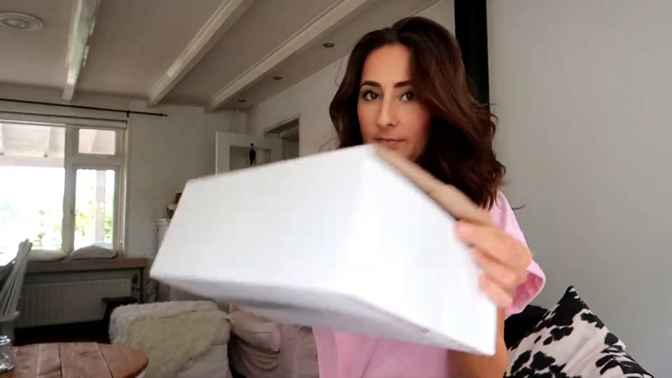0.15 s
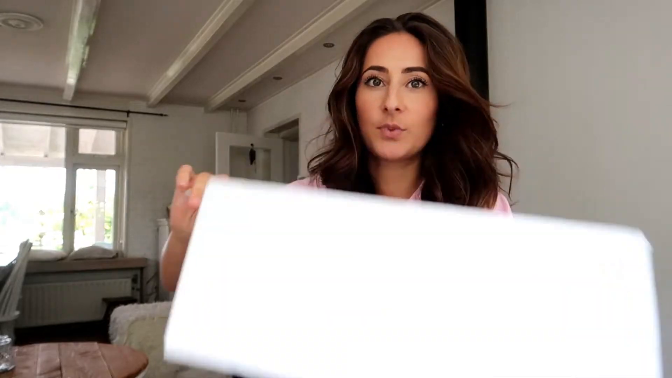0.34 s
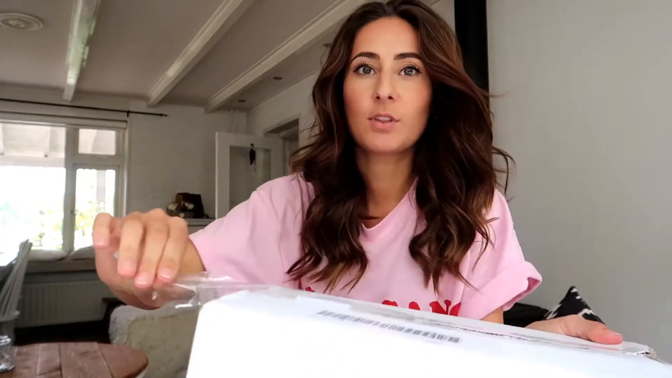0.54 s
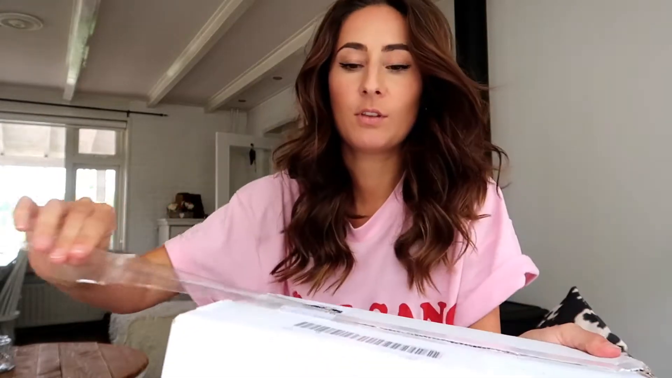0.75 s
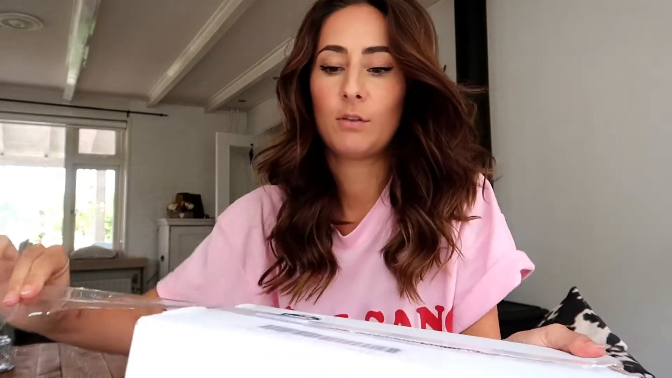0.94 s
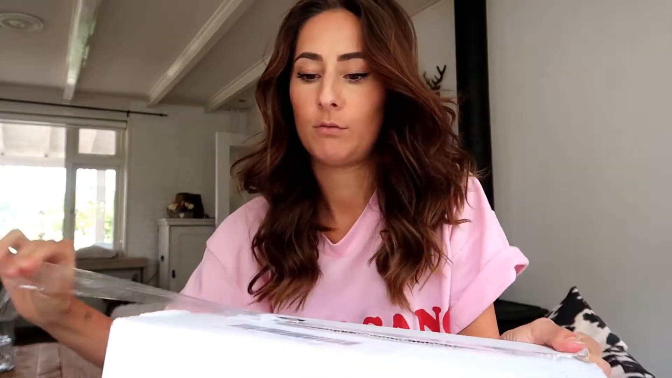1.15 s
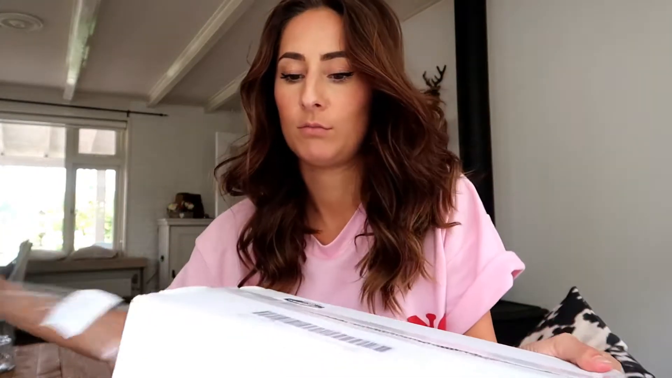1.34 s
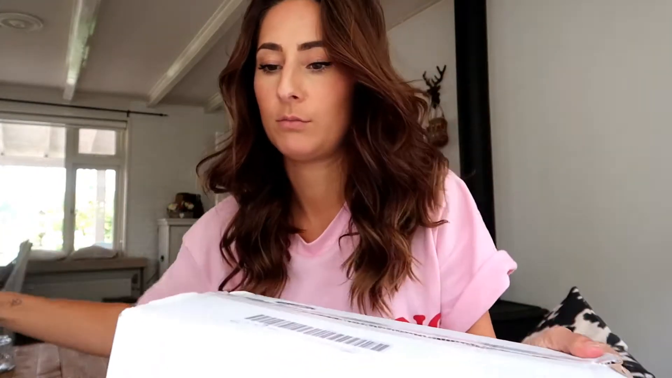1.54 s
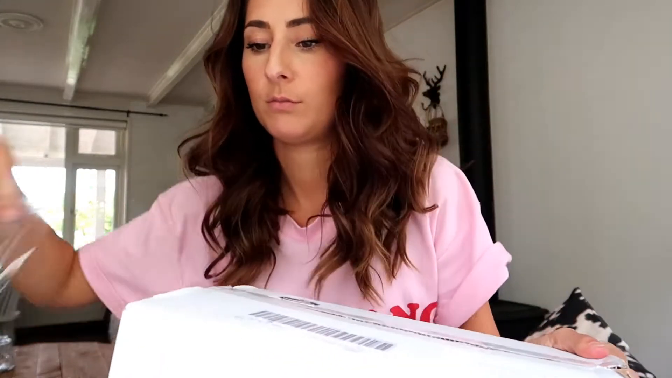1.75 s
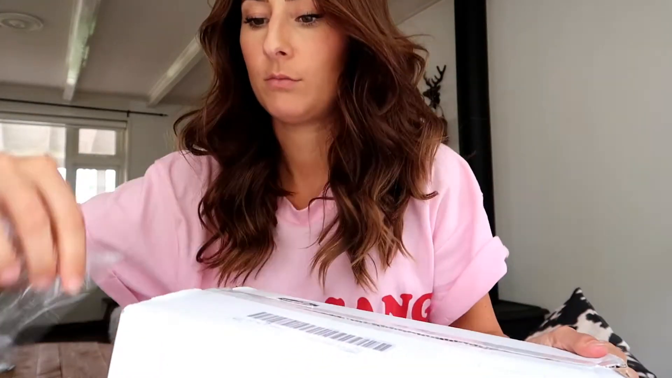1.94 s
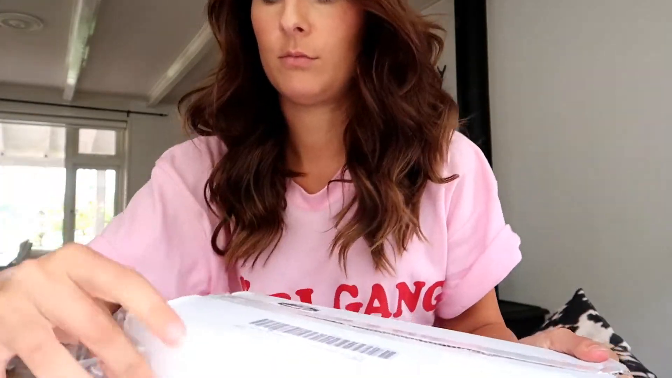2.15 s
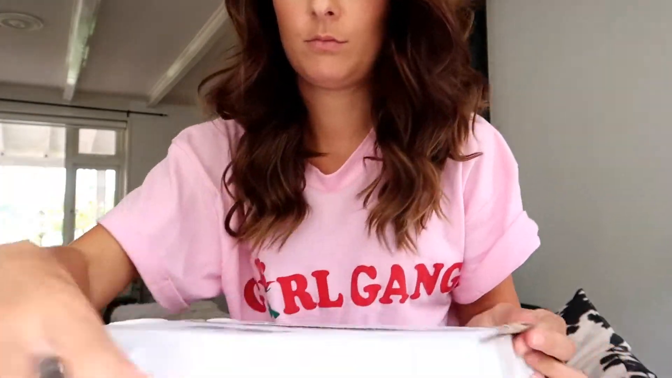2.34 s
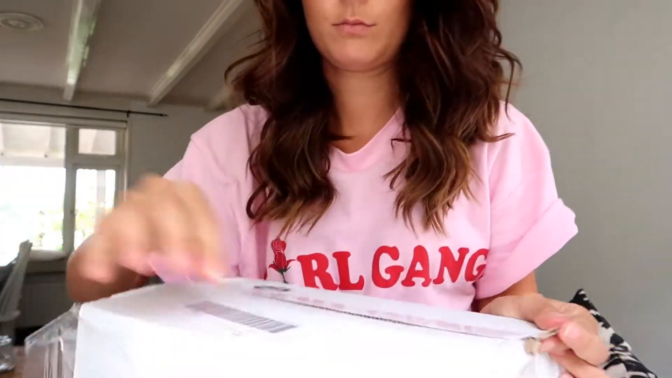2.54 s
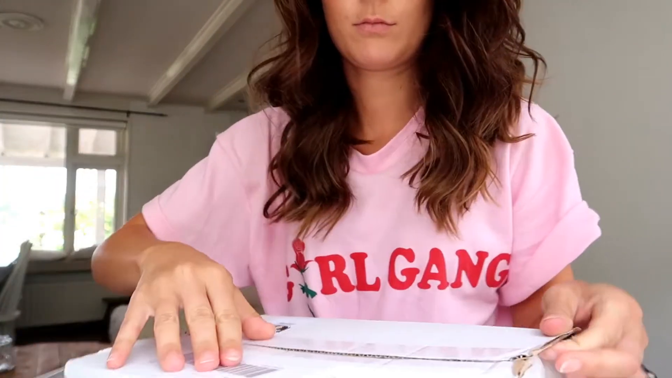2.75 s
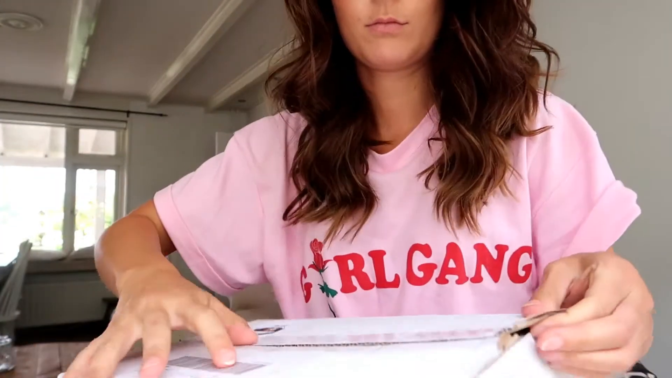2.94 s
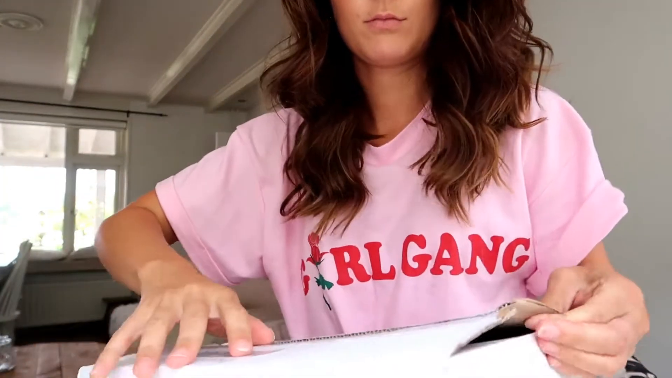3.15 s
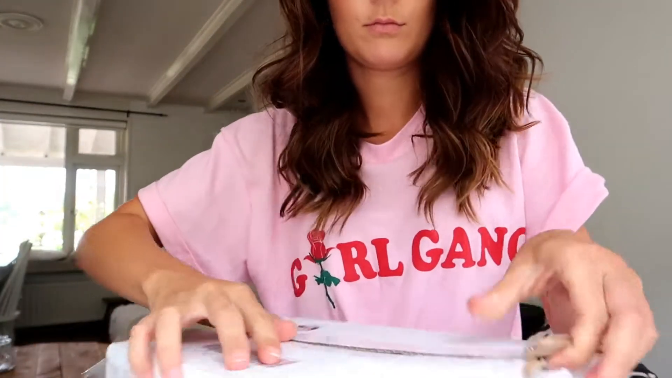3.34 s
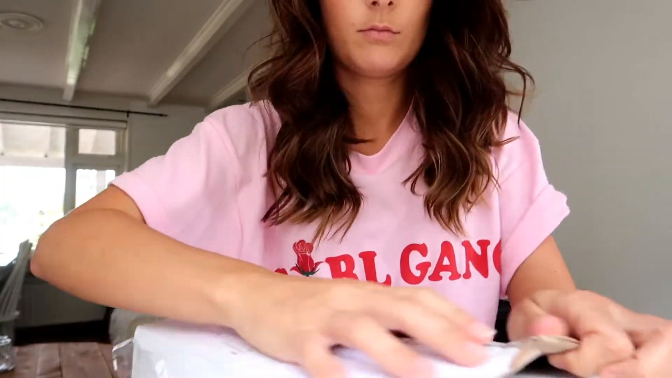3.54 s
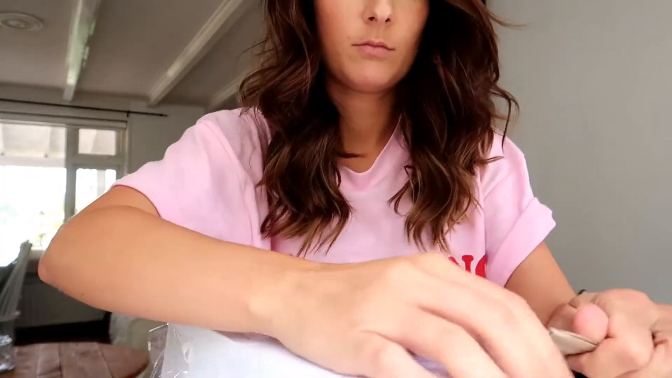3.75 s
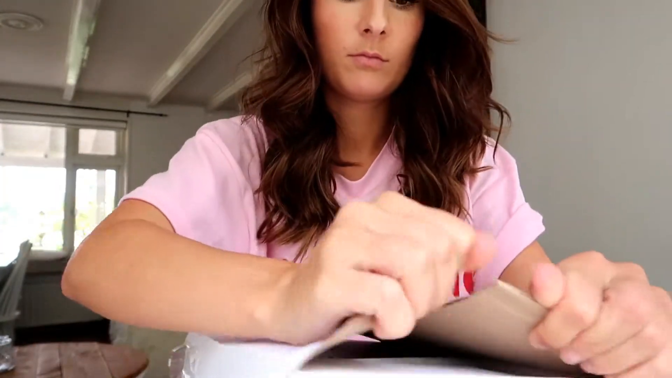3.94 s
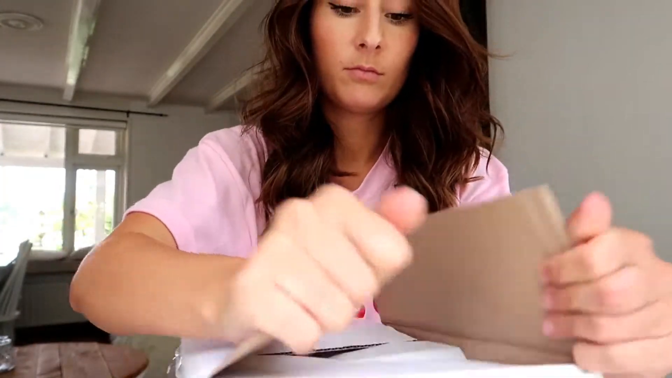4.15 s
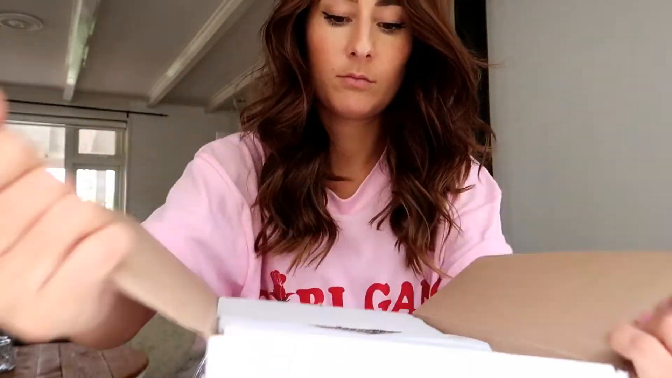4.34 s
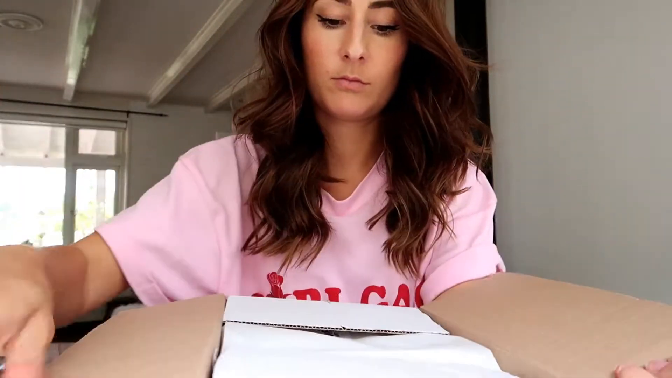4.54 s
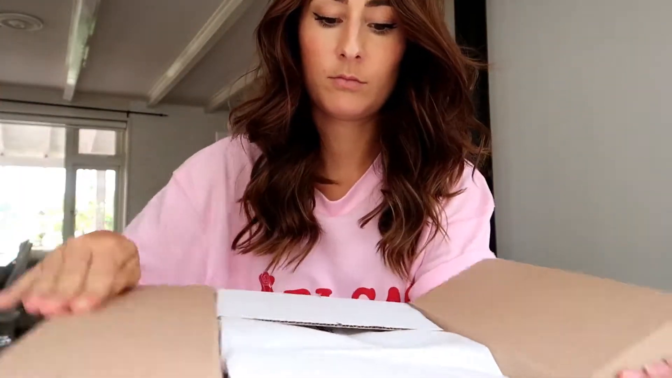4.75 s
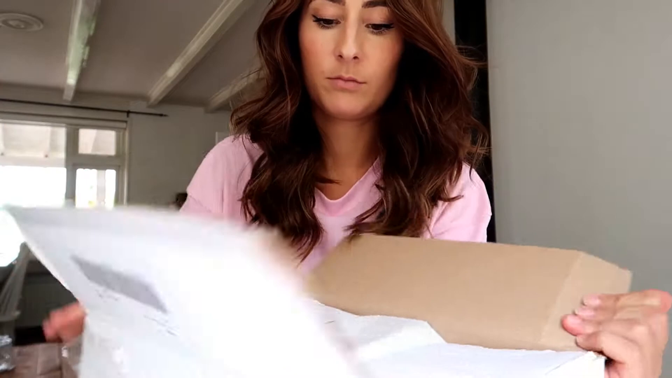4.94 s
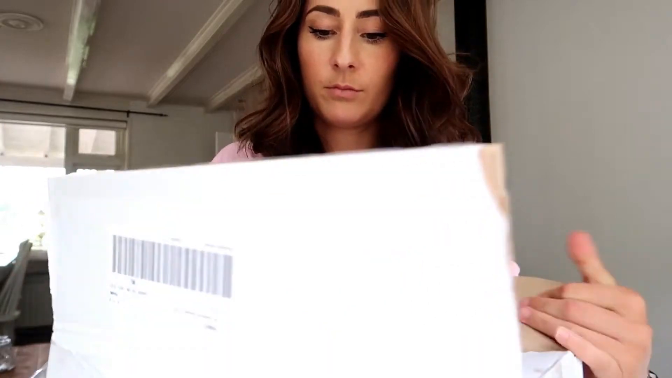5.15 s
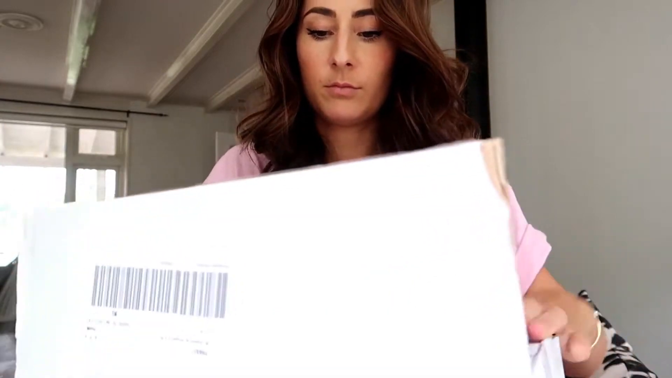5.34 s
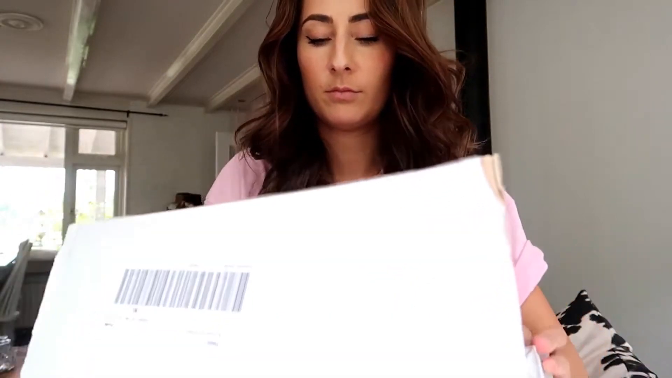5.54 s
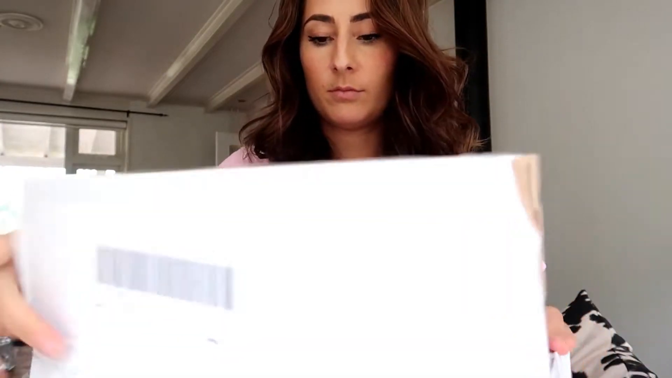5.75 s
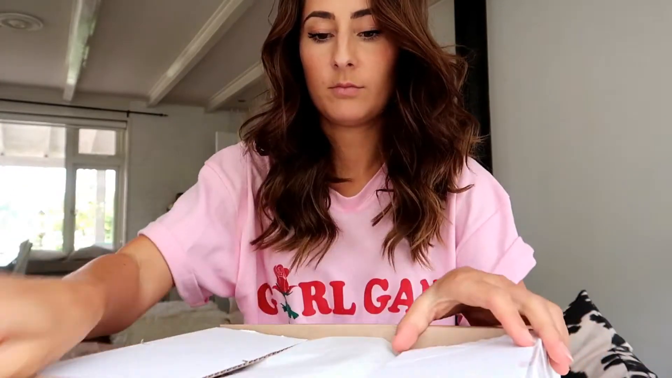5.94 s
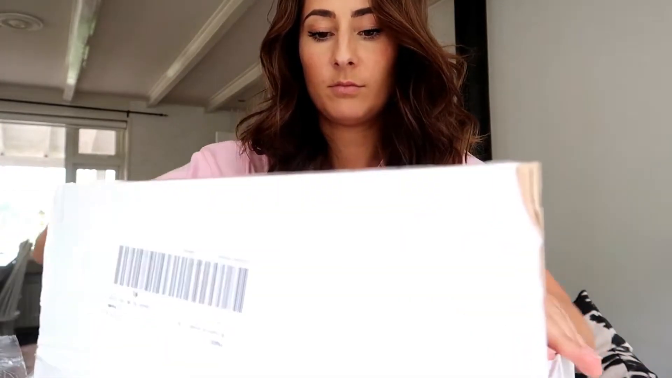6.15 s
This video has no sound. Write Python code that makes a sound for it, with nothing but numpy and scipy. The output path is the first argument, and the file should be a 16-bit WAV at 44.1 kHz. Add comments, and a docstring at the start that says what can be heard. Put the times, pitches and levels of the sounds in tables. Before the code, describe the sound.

Packing tape rips off a hollow cardboard parcel in sharp bursts, then hands knock, rustle and snap the flaps open in a furnished room.

```python
"""Packing tape tears off a cardboard parcel, close to a small stereo microphone in a furnished room.
Stick-slip friction supplies bursts of tiny slips, which parallel resonances of tape and card colour.
Hands rub, knock and push the box: its hollow body booms, its panels and the hollow under the flaps ring.
Sharp snaps are crumbling bursts of band-passed noise; reflections, a faint murmur and a low hum lie behind.
"""
import sys
import numpy as np
from scipy import signal
from scipy.fft import rfft, irfft, next_fast_len
from scipy.io import wavfile
from scipy.ndimage import uniform_filter1d

SR = 44100
rng = np.random.default_rng(int(sys.argv[2]) if len(sys.argv) > 2 else 0)


def persist_wave(psi):
    """Save psi, clipped to +-1, as 16-bit WAV."""
    counts = np.round(np.clip(psi, -1, 1) * 32767).astype(np.int16)
    wavfile.write(sys.argv[1], SR, np.atleast_2d(counts).T)


N = 273420   # length in samples

# Two pulls on the tape and the last tug that frees it.
# Each row: start in seconds, swell in seconds, hold in seconds, rustle level in dB.
TAPE_PULLS = [(0.696, 0.077, 0.064, -21.5), (1.188, 0.0027, 0.11, -23), (1.349, 0.012, 0.011, -29.5)]
PULL_SWELL_DB, PULL_RELEASE_DB_PER_S = 10, 248   # depth from which a pull swells; fall as the strip lets go
PULL_BOOM_DB, PULL_PANEL_DB, PULL_SIZZLE_DB = 1, 5, 1.5   # over the rustle, at the start of a pull
# The box is shaken less as the strip comes away.
PULL_BOOM_SAG_DB_PER_S, PULL_PANEL_SAG_DB_PER_S = 75.5, 59.5

# Hands on the box, written in three stretches of time, with a sudden change just after 2.06 s. # Each row: time
# in seconds, rustle level in dB, weight of the grip as boom over rustle in dB, # crispness as sizzle over
# rustle in dB.
HAND_MOVES = [
    [(0.0, -47, 6, -5), (0.22, -52, 1.5, -27), (0.34, -47, 3.5, -22), (0.83, -38, 4.5, -7),
     (1.02, -44.5, -6, -6), (1.23, -52.5, 16, -30), (1.36, -26, -33, -24), (1.61, -55.5, 1.5, -33),
     (1.78, -77, 23.5, -16.5), (2.06, -69.5, 9, -18)],
    [(2.08, -48, 11.5, -5), (2.12, -56, 16.5, 4), (2.25, -45.5, 10, -6), (2.3, -33, 3, 1),
     (2.44, -49, 2, -28), (2.55, -51, 12.5, -5.5), (3.34, -49, 7, -16), (3.47, -41.5, 2.5, -2.5),
     (4.09, -44.5, 0.5, -10.5), (4.14, -58.5, -2, -19)],
    [(4.16, -34.5, 7.5, -20), (4.27, -53.5, -4, -39), (4.48, -50.5, 11.5, -2.5), (4.77, -45.5, 0.5, -3),
     (4.94, -44.5, -10, -2.5), (5.19, -40.5, -1.5, -22), (5.68, -47, 7.5, -7.5), (5.79, -44.5, 0.5, -12),
     (6.2, -47.5, 7, -4)],
]
PANEL_DB, PANEL_WEIGHT_SHARE = -3.5, 0.75   # drumming over rustle; share of the grip's weight reaching it
FUMBLE_DB, FUMBLES_PER_S = 2.5, 6.3   # the fingers stop and start
HURRY_REFERENCE_DB = -48   # rustle level at which slips come at their stated rate

# Snaps of tape, glue and card.
# Each row: start in seconds, level before the band filter in dB, pitch in Hz, crumble (to 1/e) in ms.
SNAP_EVENTS = [(0.001, -29, 1910, 36), (0.296, -29, 3300, 2.1), (0.469, -18.5, 1370, 8.3),
               (0.597, -27.5, 2300, 3), (0.679, -30, 2690, 2.8), (0.6945, -14, 2050, 2.2),
               (0.7112, -13, 1400, 4.1), (1.0127, -32.5, 2840, 7.1), (1.1918, -5, 1520, 4.2),
               (1.2203, -16.5, 2400, 1.3), (1.2371, -11, 1450, 7.2), (1.282, -33, 2840, 3.2),
               (1.351, -28, 2900, 3.4), (1.3752, -7, 1730, 8.7), (2.0732, -33.5, 1850, 5.4),
               (2.087, -26.5, 2230, 6), (2.102, -30.5, 2560, 6), (2.1211, -24.5, 1960, 16),
               (2.1336, -23.5, 2700, 6.4), (2.146, -33.5, 4200, 13), (2.2452, -21.5, 3600, 3),
               (2.258, -9, 2380, 1.1), (2.301, -25, 3600, 4), (2.356, -20.5, 1770, 10.5),
               (2.398, -25, 2130, 7.8), (2.434, -32, 2200, 3.3), (2.583, -36, 1780, 8.2),
               (2.6407, -25, 1550, 19), (2.781, -28, 1730, 22), (2.827, -29.5, 2510, 5.9),
               (2.841, -23.5, 2600, 2.5), (2.985, -28.5, 1860, 2.6), (3.05, -15.5, 1310, 5),
               (3.058, -25.5, 3000, 2.9), (3.122, -30.5, 2650, 1.5), (3.3358, -24.5, 1230, 8.2),
               (3.5287, -14.5, 2200, 4), (3.768, -28.5, 1960, 6.2), (3.779, -39, 2840, 8.4),
               (3.8707, -25.5, 1210, 6.5), (3.913, -31, 1840, 3.6), (3.9674, -1.5, 1550, 5.5),
               (3.981, -14, 2590, 4), (4.15, -4, 1460, 2.1), (4.568, -39.5, 3350, 4),
               (4.714, -25, 1900, 8.2), (5.0145, -19, 2820, 1.6), (5.025, -19.5, 1100, 4.2),
               (5.056, -26.5, 1970, 5.7), (5.081, -23.5, 2190, 4.4), (5.103, -30, 2300, 1.7),
               (5.2461, -21, 2360, 1.6), (5.447, -11.5, 1790, 1.26), (5.583, -35, 1490, 8.7),
               (5.596, -28, 2120, 3.6), (5.614, -18, 1870, 10.7), (5.628, -14.5, 1220, 0.91),
               (5.66, -28, 2180, 4.2), (5.685, -21, 1880, 2.7), (5.7625, -37, 2600, 2),
               (5.827, -23, 1950, 2.4), (5.85, -30, 2200, 14), (5.8921, -24, 2780, 14.4),
               (5.955, -21.5, 1450, 8.6), (6.032, -29.5, 1590, 16), (6.048, -26, 1560, 5.9),
               (6.131, -27, 2380, 3.8), (6.185, -26, 1620, 8.5)]
GRAIN_SPREAD_DB, GRAIN_SAMPLES = 2, 5   # unevenness and length of the grains within a snap
SNAP_RISE = 0.14   # share of the crumble time in which a snap builds up

# Knocks on the panels. Each row: start in seconds, peak level in dB, pitch in Hz.
PANEL_KNOCKS = [(0.004, -24, 474), (0.334, -28, 352), (0.461, -14, 567), (0.485, -17, 375),
                (0.696, -19.5, 470), (1.197, -20, 477), (1.219, -16, 530), (1.239, -12, 535),
                (1.278, -33.5, 453), (1.381, -6, 562), (2.133, -28.5, 495), (2.187, -23, 674),
                (2.244, -24, 454), (2.355, -23, 367), (2.39, -20.5, 620), (2.641, -22, 580),
                (2.68, -15, 676), (3.05, -39, 885), (3.315, -23, 504), (3.481, -15.5, 670),
                (3.529, -11.5, 720), (3.68, -10, 673), (3.968, -7.5, 440), (3.982, -10.5, 554),
                (4.152, -8, 454), (4.159, -6, 473), (4.2, -20, 494), (4.402, -30.5, 417),
                (4.443, -19.5, 656), (4.759, -27, 650), (5.023, -12, 638), (5.08, -19.5, 630),
                (5.248, -15.5, 600), (5.338, -18, 590), (5.412, -22, 500), (5.446, -17.5, 695),
                (5.615, -22, 518), (5.83, -26.5, 555), (5.879, -23.5, 600), (6.11, -24.5, 550),
                (6.128, -21.5, 560)]
# Pushes that swing a whole wall of the box. Each row: start in seconds, peak level in dB, pitch in Hz.
WALL_THUMPS = [(0.46, -22.5, 100), (0.5, -18, 161), (1.229, -9.5, 164), (1.352, -23, 79), (2.186, -27, 199),
               (2.243, -23, 160), (2.325, -17.5, 200), (2.64, -11.5, 164), (2.76, -24.5, 171),
               (3.045, -24.5, 154), (3.312, -25, 158), (3.465, -15.5, 146), (3.53, -15, 160),
               (3.49, -14, 162), (3.555, -14, 159), (3.578, -17.5, 155), (3.6, -18.5, 149),
               (3.675, -15.5, 168), (3.968, -10, 162), (4.152, -9, 156), (4.4, -27, 232), (4.662, -26, 184),
               (4.714, -25.5, 153), (5.025, -17.5, 225), (5.075, -20, 93), (5.335, -21.5, 161),
               (5.61, -30.5, 100), (5.76, -20.5, 98), (5.826, -15, 125), (6.1, -22, 98)]
KNOCK_CYCLES, THUMP_CYCLES = 1.7, 0.6   # cycles in which a blow falls to 1/e

# The taut strip of tape. Each row: frequency in Hz, width in Hz, relative level in dB.
TAPE_MODES = [(1190, 340, -2.5), (1850, 660, 0.5), (3060, 1700, -2), (4260, 4800, -12)]
# Small folds and edges that colour the rustle. Each row: frequency in Hz, width in Hz, relative level in dB.
FOLD_MODES = [(1010, 450, -9), (1232, 110, -1), (1810, 313, -4), (2640, 462, -7), (3230, 475, -9.5),
              (4060, 870, -25.5)]
# Thin film and paper fibres. Each row: frequency in Hz, width in Hz, relative level in dB.
FILM_MODES = [(4500, 5950, 18.5), (6730, 2220, 21.5), (11000, 1800, 17)]
# Cardboard panels. Each row: frequency in Hz, width in Hz, relative level in dB.
PANEL_MODES = [(331, 65, -2), (433, 47, 3), (542, 98, 1.5), (630, 84, 2), (783, 110, -3.5)]
# The hollow under the flaps, ringing on after a knock.
# Each row: frequency in Hz, width in Hz, relative level in dB.
HOLLOW_MODES = [(510.7, 6.1, -1.5), (543, 15, 3.5), (593, 7.7, 5)]
# Air and walls of the hollow box. Each row: frequency in Hz, width in Hz, relative level in dB.
BOX_MODES = [(57.7, 51, -8), (94.1, 5.4, 1), (119.4, 22, -11.5), (169.6, 12, 4), (218, 32.2, -3.5),
             (283.3, 31.7, -7)]

ROOM_T60_S, ROOM_DB, ROOM_GAP_S = 0.45, -12, 0.0016   # decay time, level, delay of the first reflection
# Spectral outline of the room murmur. Each row: frequency in Hz, relative density in dB per Hz.
MURMUR_OUTLINE = [(15, -45.5), (25, -38), (168, 2), (199, -23.5), (225, -12), (308, -12.5), (699, -36.5),
                  (1550, -26), (8000, -43.5), (10400, -86), (17600, -120)]
MURMUR_DB = -54   # rms level
# Low hum that swells slightly, then sinks. Each row: time in seconds, rms level in dB before its waver.
HUM_LEVELS = [(0.0, -51), (1.214, -46), (1.499, -56.5)]
HUM_HZ, HUM_WAVER_DB = 51, 1.5
# Difference between the two ports. Each row: frequency in Hz, gain of the side signal in dB.
SIDE_OUTLINE = [(100, -41.5), (300, -19.5), (1500, -18.5), (3000, -11.5), (6000, 1), (9000, 5.5),
                (15000, 4.5)]
OVERLOAD, CUTOFF_HZ = 1.05, 16200   # amplitude towards which peaks are rounded; top of the band


def parcel():
    """Forced vibration: slips, snaps and blows drive the coupled parts of tape and box."""
    grip, pull = hands(), pulls()
    boom, drumming, rustle, sizzle = np.hypot(grip, pull)   # independent forces add in power
    # harder handling tears faster, so slips come denser
    hurry = np.clip(rustle / from_db(HURRY_REFERENCE_DB), 0.5, 9)
    coarse = slips(per_s=300 * hurry, spread_db=6.0, clump_db=5.5)
    fine = slips(per_s=1100 * hurry, spread_db=-5.0, clump_db=5.0)
    rub = rubbing()
    crack, grit = snaps()
    strip = tape(pull[2], coarse, fine, rub)
    crackle = folds(grip[2], hurry, fine, rub)
    # a snap is as bright as the material being handled at that moment
    film_force = sizzle * (0.27 * fine + 0.35 * rub) + 0.19 * sizzle / rustle * grit
    film = body(film_force, FILM_MODES, wander_db=1.5)
    return strip + crackle + crack + film + panels(drumming, coarse, rub) + box(boom, coarse, rub)


def tape(pull_gain, coarse, fine, rub):
    """Stick-slip excitation: the taut strip resonates to the release of its glue."""
    force = pull_gain * (0.67 * coarse + 0.75 * fine + 0.47 * rub)
    return body(force, TAPE_MODES, wander_db=2.0)


def pulls():
    """Envelope of forced peeling: swell, hold, release; gains of boom, panels, rustle and sizzle."""
    t, gains = np.arange(N) / SR, 0
    for start_s, swell_s, hold_s, level_db in TAPE_PULLS:
        since = np.maximum(t - start_s, 0)
        release_db = PULL_RELEASE_DB_PER_S * np.maximum(since - swell_s - hold_s, 0)
        swell_db = PULL_SWELL_DB * np.maximum(1 - since / swell_s, 0)
        rustle_db = level_db - release_db - swell_db
        boom_db = rustle_db + PULL_BOOM_DB - PULL_BOOM_SAG_DB_PER_S * since
        panel_db = rustle_db + PULL_PANEL_DB - PULL_PANEL_SAG_DB_PER_S * since
        sizzle_db = rustle_db + PULL_SIZZLE_DB
        gains = gains + (t >= start_s) * from_db([boom_db, panel_db, rustle_db, sizzle_db])
    return gains


def slips(per_s, spread_db, clump_db):
    """Shot noise: glue and fibres let go in clumps of uneven clicks; mean power 1 at any rate."""
    chance = per_s * from_db(clump_db * drift(30)) / SR
    born = rng.random(N) < chance
    size_db = spread_db * np.minimum(rng.exponential(1, N), 4)
    clicks = born * from_db(size_db) * rng.choice([-1, 1], N)
    return rms_one(clicks / np.sqrt(per_s))


def snaps():
    """Brittle release: each snap is a granular burst, its crack loudest in the octave or so around its pitch."""
    crack, grit = np.zeros(N + SR), np.zeros(N + SR)
    t = np.arange(SR // 8) / SR
    for start_s, level_db, hz, crumble_ms in SNAP_EVENTS:
        crumble_s = crumble_ms / 1000
        noise, lumps = rng.standard_normal((2, len(t)))
        unevenness = rms_one(uniform_filter1d(lumps, size=GRAIN_SAMPLES))
        grains = rms_one(noise * from_db(GRAIN_SPREAD_DB * unevenness))
        envelope = np.exp(-t / crumble_s) * np.minimum(t / (SNAP_RISE * crumble_s), 1)
        burst = from_db(level_db) * grains * envelope
        band = signal.butter(2, [hz / 1.6, hz * 1.55], "band", fs=SR, output="sos")
        first = int(start_s * SR)
        at = slice(first, first + len(t))
        crack[at] += 2.88 * signal.sosfilt(band, burst)
        grit[at] += burst * (hz / 3000) ** 0.46   # higher snaps carry more treble
    return crack[:N], grit[:N]


def hands():
    """Modulated friction: grip and rubbing set the gains of boom, panels, rustle and sizzle."""
    times, *columns = np.vstack(HAND_MOVES).T
    t = np.arange(N) / SR
    rustle_db, weight_db, crisp_db = [np.interp(t, times, column) for column in columns]
    rustle_db = rustle_db + FUMBLE_DB * drift(FUMBLES_PER_S)
    drumming_db = PANEL_DB + PANEL_WEIGHT_SHARE * weight_db
    return from_db(rustle_db + [weight_db, drumming_db, np.zeros(N), crisp_db])


def rubbing():
    """Sliding friction: skin and card give noise in uneven strokes."""
    return rms_one(rng.standard_normal(N) * from_db(2.0 * drift(55)))


def folds(grip_gain, hurry, fine, rub):
    """Independent excitation: every fold crinkles on its own, so each crackle has its own colour."""
    crinkles = np.array([slips(per_s=500 * hurry, spread_db=4.5, clump_db=5.0) for fold in FOLD_MODES])
    return body(grip_gain * (0.75 * crinkles + 0.4 * fine + 0.3 * rub), FOLD_MODES, wander_db=2.5)


def panels(drumming, coarse, rub):
    """Plate resonance: slips and knocks ring the panels; knocks also excite the hollow under the flaps."""
    knock = blows(PANEL_KNOCKS, KNOCK_CYCLES)
    force = drumming * (0.57 * coarse + 0.5 * rub) + 0.049 * knock
    ringing = body(force, PANEL_MODES, wander_db=3.5)
    hollow = 0.028 * body(knock, HOLLOW_MODES, wander_db=5.0)
    return ringing + knock + hollow


def box(boom, coarse, rub):
    """Cavity resonance: handling and pushes on the walls make the hollow box boom."""
    thump = blows(WALL_THUMPS, THUMP_CYCLES)
    force = boom * (coarse + 0.36 * rub) + 0.062 * thump
    return body(force, BOX_MODES, wander_db=3.0) + thump


def blows(table, cycles):
    """Damped oscillation: a blow is a few dying cycles of the struck spot or wall."""
    out, t = np.zeros(N + SR), np.arange(SR // 12) / SR
    for start_s, level_db, hz in table:
        envelope = np.exp(-t * hz / cycles) * np.minimum(t * hz * 2.2, 1)
        swing = np.sin(2 * np.pi * hz * t) * envelope
        first = int(start_s * SR)
        out[first:first + len(t)] += from_db(level_db) * swing / np.abs(swing).max()
    return out[:N]


def body(force, modes, wander_db):
    """Modal superposition: parallel resonances with wandering drive; white rms 1 comes out near rms 1."""
    pulse = np.zeros(N)
    pulse[0] = 1
    out, forces = 0, np.broadcast_to(force, (len(modes), N))   # one force for all, or one for each
    for k, (hz, width_hz, level_db) in enumerate(modes):
        r = np.exp(-np.pi * width_hz / SR)
        a = [1, -2 * r * np.cos(2 * np.pi * hz / SR), r * r]
        b = (1 - r * r) / 2 * np.array([1, 0, -1]) * from_db(level_db) * (-1) ** k   # alternate polarity
        driven = forces[k] * from_db(wander_db * drift(7.3))
        out = out + signal.lfilter(b, a, np.array([driven, pulse]) + 1e-18)
    response, impulse_response = out
    return response / np.sqrt(np.sum(impulse_response ** 2))


def echo(t60_s, gap_s):
    """Diffuse reverberation: a dense decaying shower of unit energy, dulled by soft furnishings."""
    t = np.arange(SR) / SR
    dulled = signal.lfilter([1], [1, -0.55], rng.standard_normal(SR))
    shower = dulled * from_db(-60 * t / t60_s) * (t > gap_s)
    return shower / np.sqrt(np.sum(shower ** 2))


def murmur():
    """Filtered noise: a steady broadband murmur of the room."""
    return from_db(MURMUR_DB) * rms_one(coloured(rng.standard_normal(N), MURMUR_OUTLINE))


def hum():
    """Amplitude modulation: a low sine tone wavers in level."""
    times, level_db = np.transpose(HUM_LEVELS)
    t = np.arange(N) / SR
    wavering_db = np.interp(t, times, level_db) + HUM_WAVER_DB * drift(2.4)
    return np.sqrt(2) * np.sin(2 * np.pi * HUM_HZ * t) * from_db(wavering_db)


def from_db(db):
    """Logarithmic level: decibels to amplitude gain."""
    return 10 ** (np.asarray(db) / 20)


def rms_one(x):
    """Power normalisation: scale to unit rms."""
    return x / np.sqrt(np.mean(x ** 2) + 1e-20)


def coloured(x, points):
    """Spectral shaping: filter by an outline of (Hz, dB) points on a logarithmic frequency axis."""
    size = next_fast_len(len(x) + SR // 4)
    hz, level_db = np.transpose(points)
    log_hz = np.log(np.fft.rfftfreq(size, 1 / SR) + 1)
    outline_db = np.interp(log_hz, np.log(hz), level_db)
    return irfft(rfft(x, size) * from_db(outline_db), size)[:len(x)]


def drift(rate):
    """Low-passed noise: slow chance of spread 1, changing about rate times a second."""
    r = np.exp(-2 * np.pi * rate / SR)
    slow = signal.lfilter([1], [1, -2 * r, r * r], rng.standard_normal(N + SR))
    return rms_one(slow[SR:])   # the first second lets the filter settle


def scene():
    """Mid-side superposition: the two ports hear alike in the bass and apart in the treble."""
    direct = parcel()
    background = murmur() + hum()
    tails = [from_db(ROOM_DB) * signal.fftconvolve(direct, echo(ROOM_T60_S, ROOM_GAP_S))[:N]
             for part in ("mid", "side")]
    mid = direct + tails[0] + background
    # the polarity of the difference between the ports changes from moment to moment
    polarity = np.tanh(3.6 * drift(320))
    side = coloured((direct + background) * polarity + tails[1], SIDE_OUTLINE)
    return np.array([mid + side, mid - side])


def record(dry):
    """Band limiting and saturation: the deepest bass is weakened, peaks are rounded, the top is cut."""
    cleared = signal.sosfilt(signal.butter(2, 40, "high", fs=SR, output="sos"), dry)
    rounded = OVERLOAD * np.tanh(cleared / OVERLOAD)
    return signal.sosfilt(signal.cheby2(14, 80, CUTOFF_HZ, fs=SR, output="sos"), rounded)


dry = scene()
out = record(dry)
persist_wave(out)
```